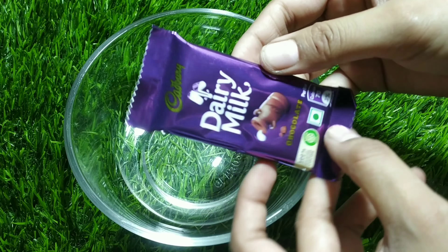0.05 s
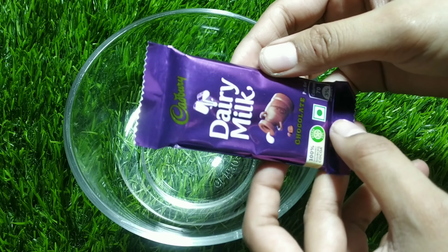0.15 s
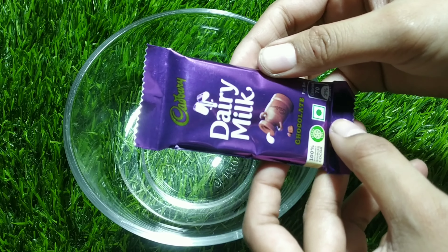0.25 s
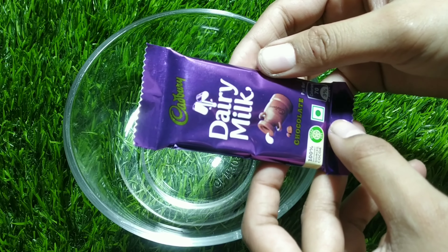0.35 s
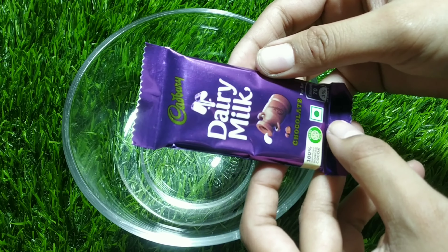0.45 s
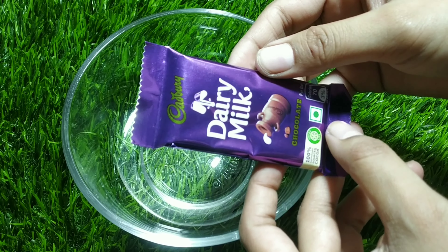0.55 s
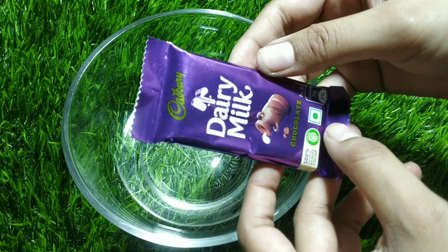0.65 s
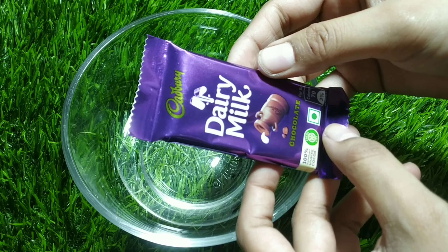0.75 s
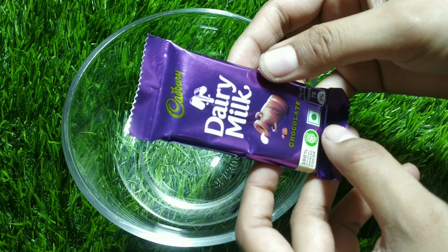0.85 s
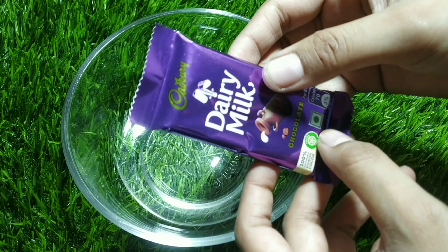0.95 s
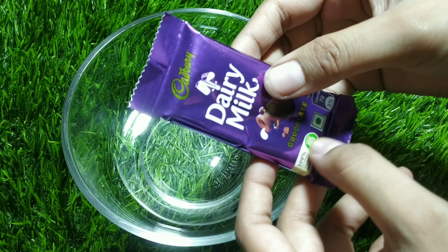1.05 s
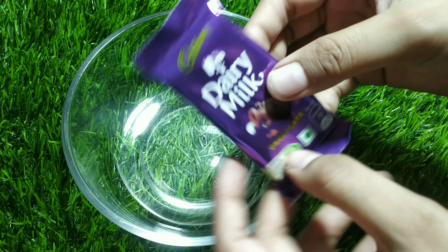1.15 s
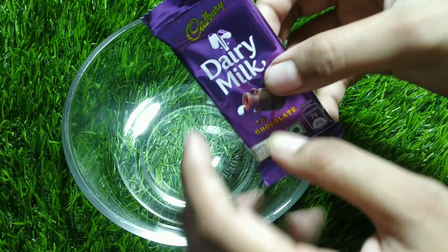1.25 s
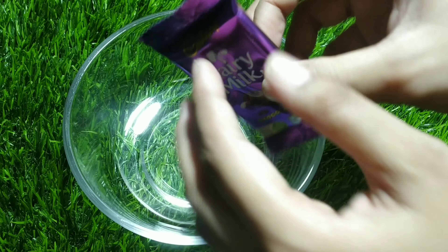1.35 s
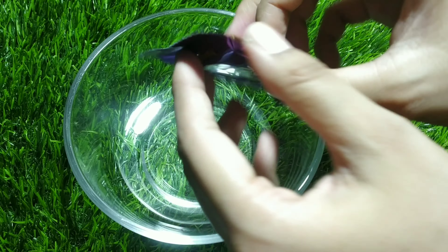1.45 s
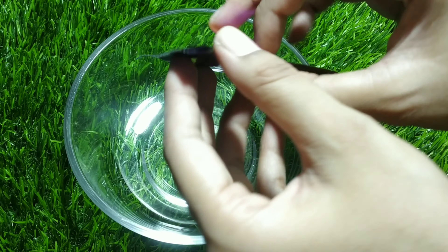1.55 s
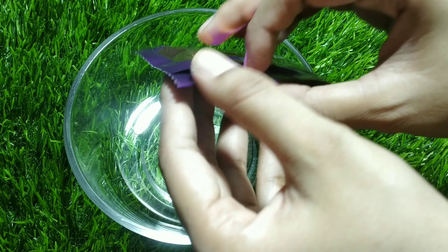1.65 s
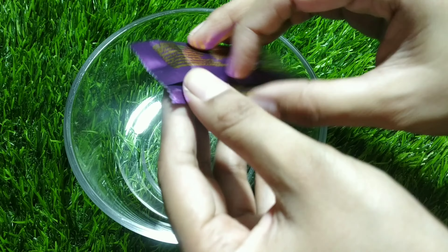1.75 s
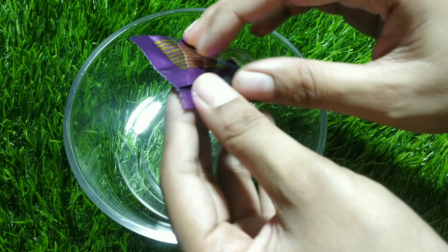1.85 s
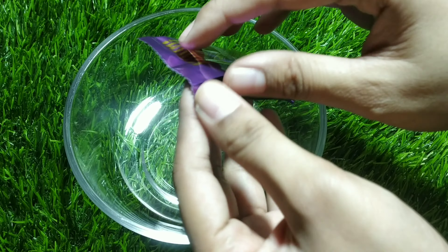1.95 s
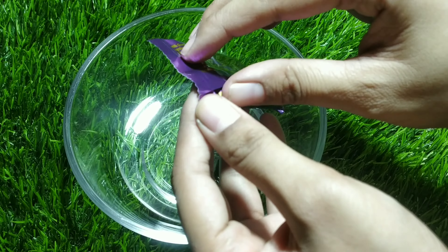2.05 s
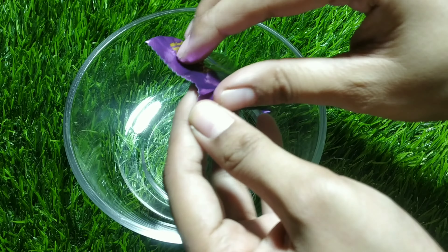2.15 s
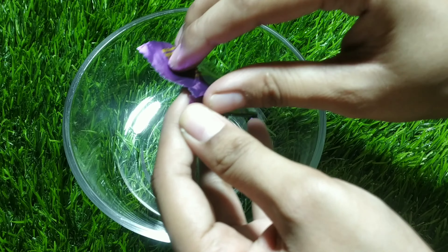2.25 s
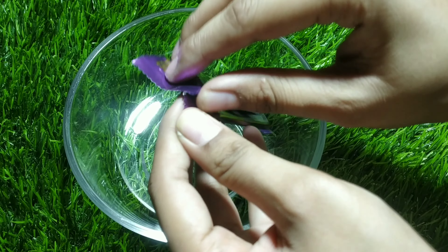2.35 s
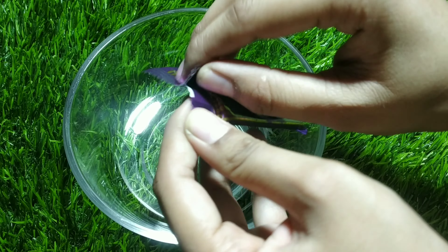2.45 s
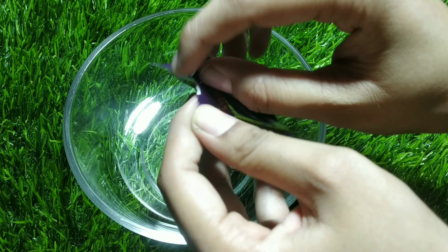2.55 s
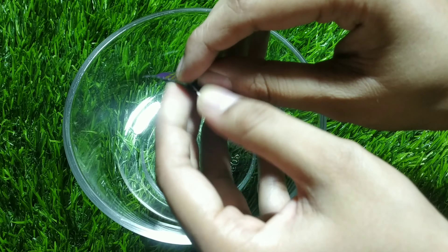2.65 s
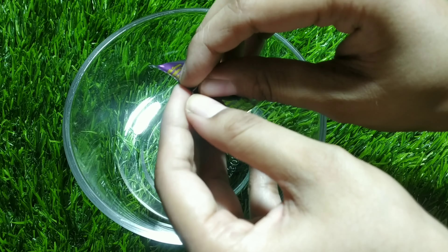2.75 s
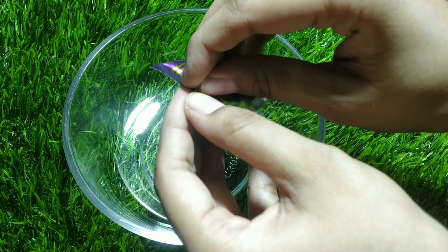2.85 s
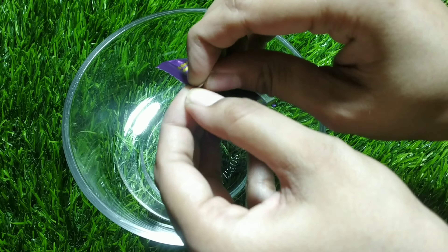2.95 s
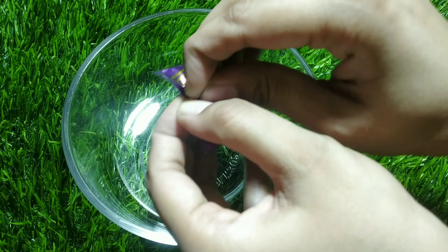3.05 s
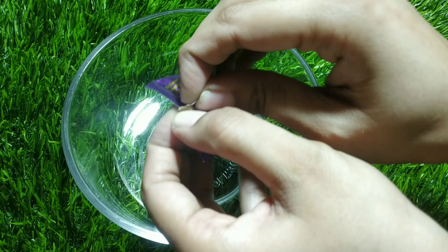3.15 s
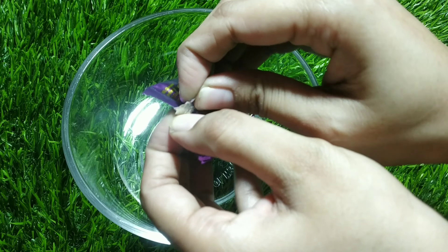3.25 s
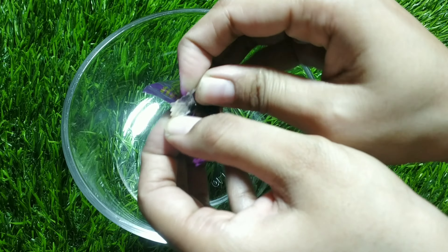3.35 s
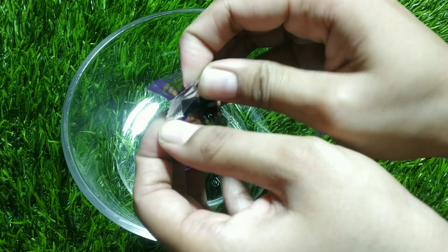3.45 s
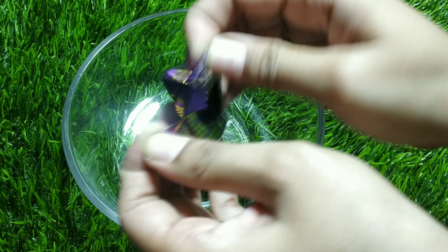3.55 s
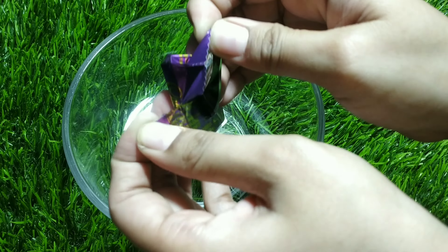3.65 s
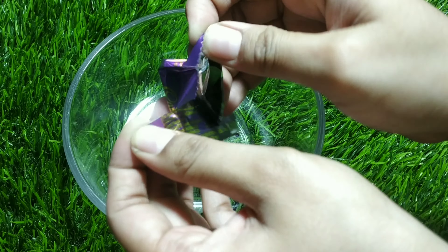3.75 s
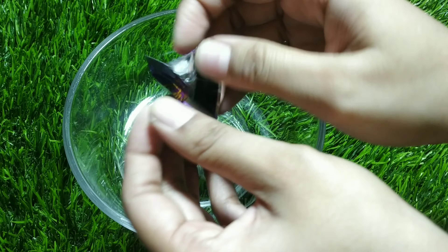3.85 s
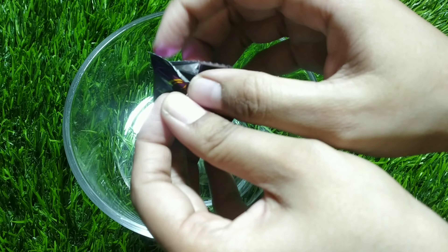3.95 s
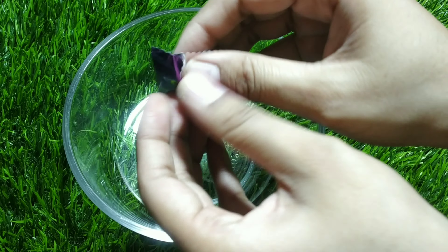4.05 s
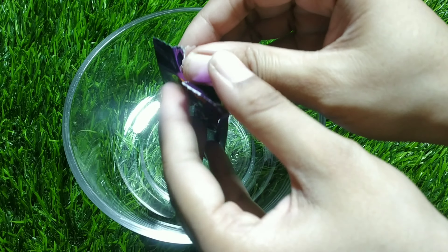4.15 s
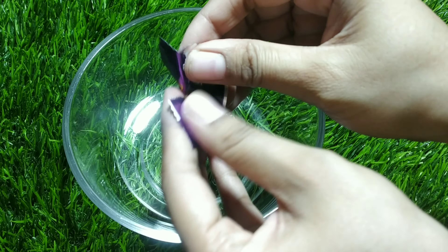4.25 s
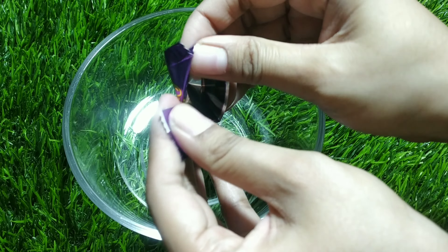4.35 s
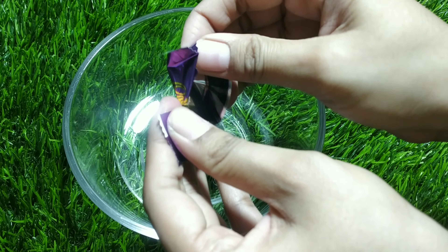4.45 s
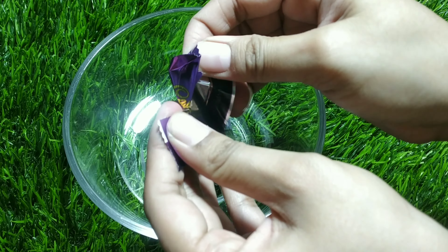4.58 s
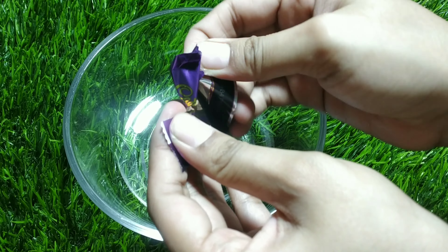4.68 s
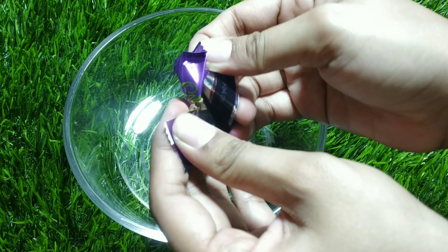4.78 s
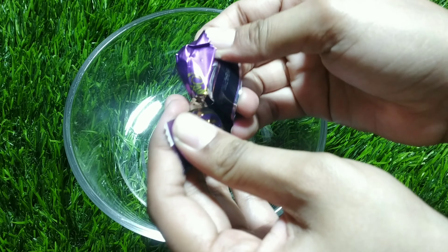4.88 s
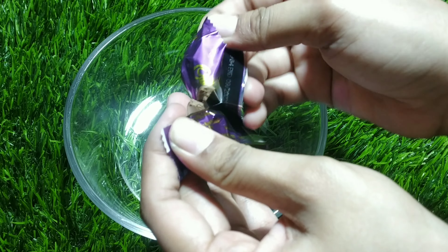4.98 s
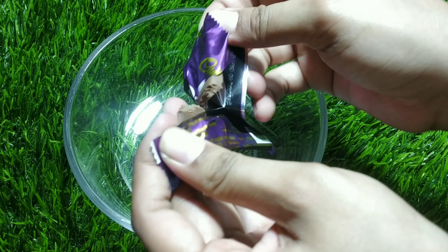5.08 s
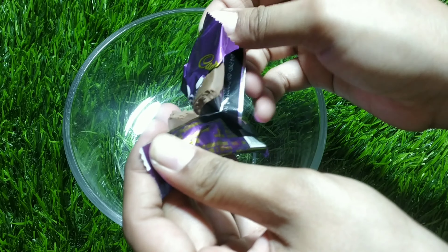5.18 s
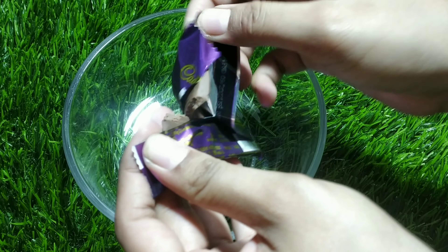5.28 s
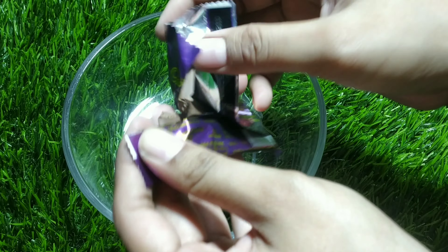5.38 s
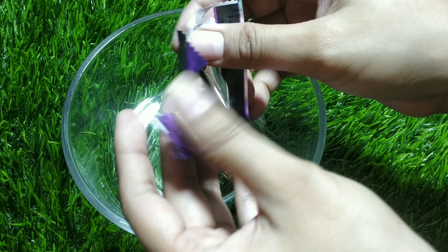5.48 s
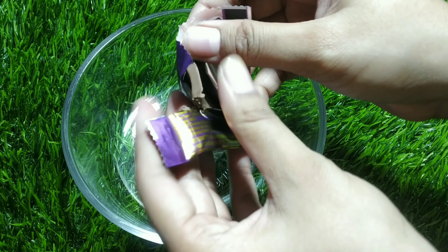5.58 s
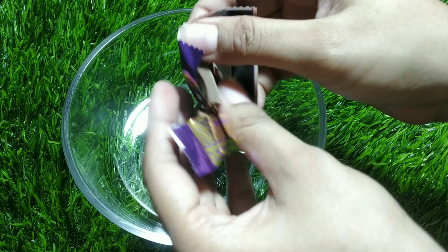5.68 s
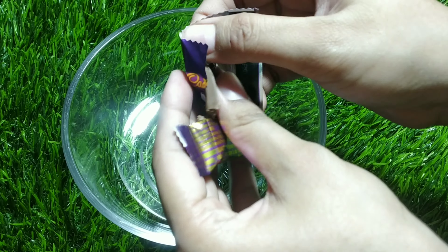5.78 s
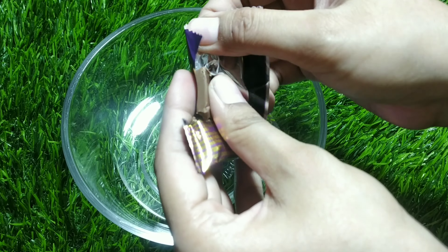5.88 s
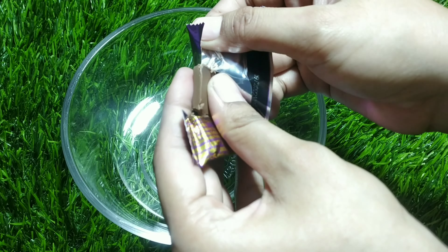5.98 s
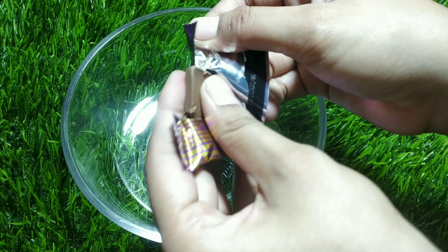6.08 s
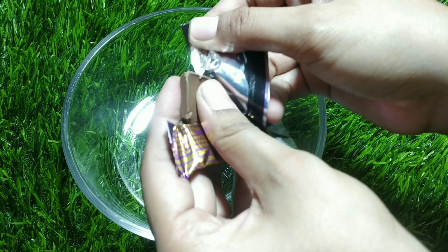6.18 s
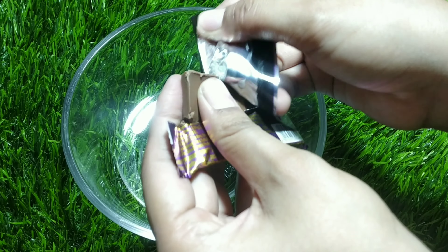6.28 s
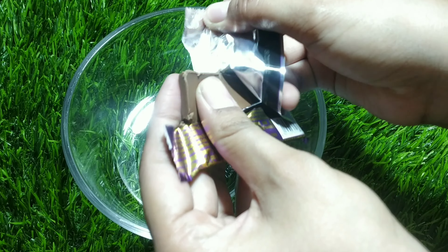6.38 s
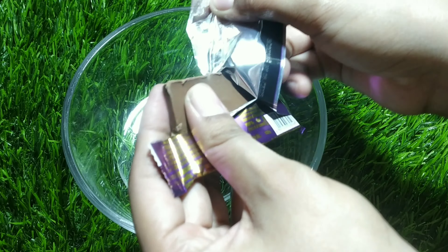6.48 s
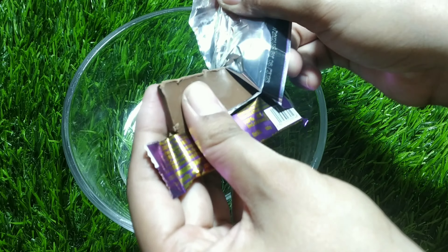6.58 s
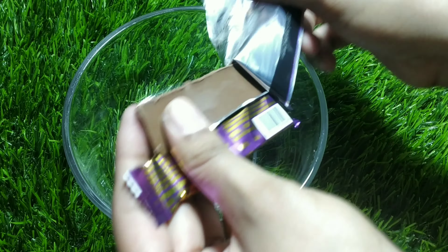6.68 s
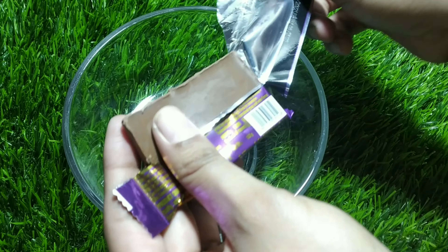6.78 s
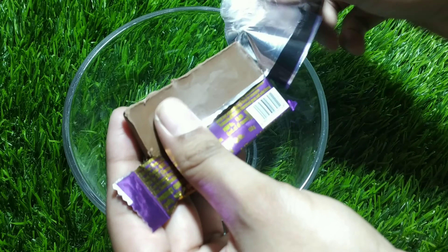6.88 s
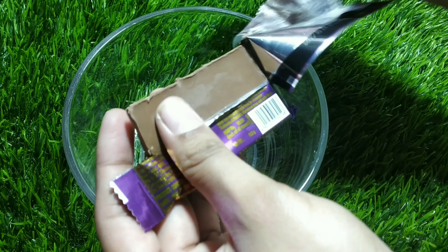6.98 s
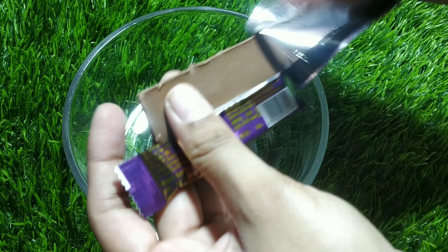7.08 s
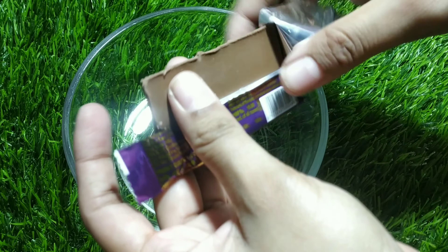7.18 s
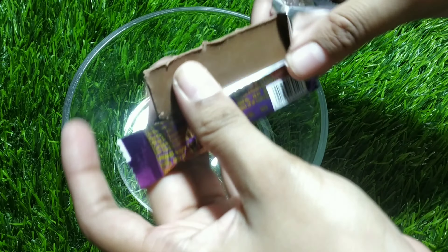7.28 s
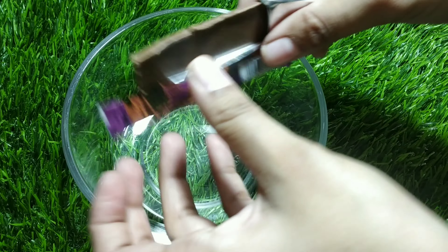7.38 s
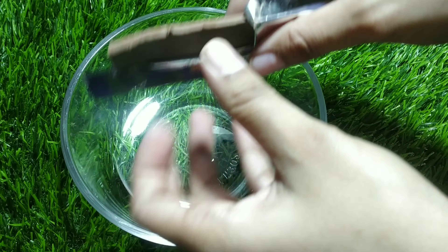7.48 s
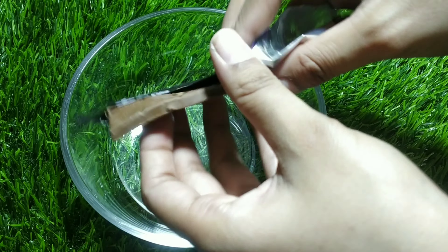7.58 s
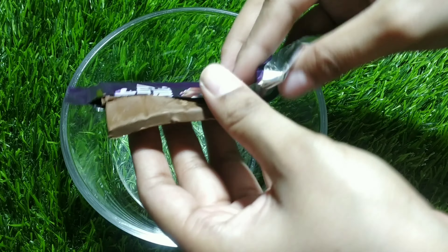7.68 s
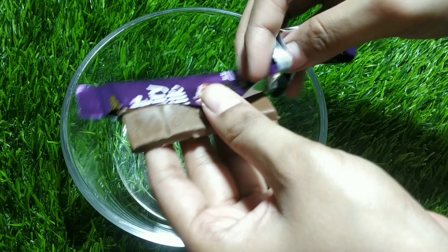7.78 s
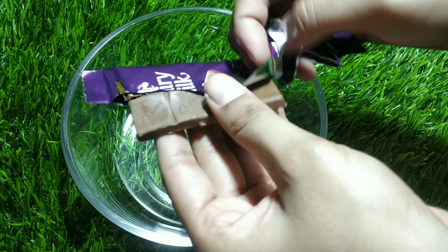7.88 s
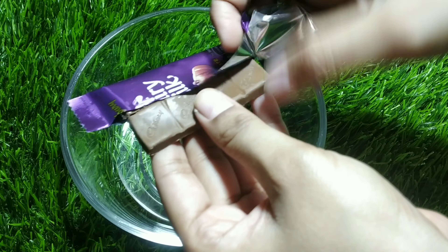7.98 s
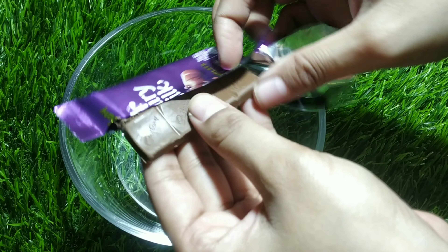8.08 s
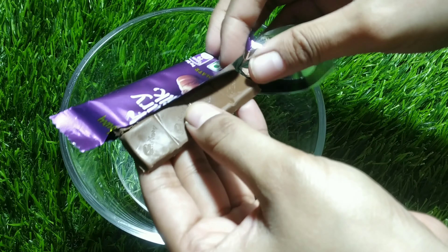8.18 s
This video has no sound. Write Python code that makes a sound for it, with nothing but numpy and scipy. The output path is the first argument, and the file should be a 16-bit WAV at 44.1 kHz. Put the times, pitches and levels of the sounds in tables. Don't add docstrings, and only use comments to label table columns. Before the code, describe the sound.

Close, dry phone pickup in a quiet room with low, slightly wavering hum and faint hiss. Around 0.1 s a few tiny foil ticks sound, then near silence. At about 1.27 s a very short, faint, rough skin squeak; from 1.8 s small bright crinkles and soft low hand brushes, with isolated snaps near 2.5 to 2.7 s. After a lull, light ticks lead to a hard, bright burst of snaps at 3.5 s, thinning to sparse ticks by 4.1 to 4.7 s. At 4.9 s the wrapper tears: strong sharp cracks, irregular and dense until about 6.2 s, with popping dents. From 6.3 to 6.9 s the foil peels with thick crackle, rustle and short pitched knocks from panels and bar, strongest around 6.7 to 6.8 s. Quieter rustles and knocks follow through 7.6 s, then renewed snapping, crackle and rustle from 7.7 s to the end.

```python
import sys
import numpy as np
from scipy import signal
from scipy.fft import rfft, irfft, next_fast_len
from scipy.io import wavfile
from scipy.ndimage import uniform_filter1d

SR = 44100
rng = np.random.default_rng(int(sys.argv[2]) if len(sys.argv) > 2 else 0)


def boost_factor(decibels):
    exponent = np.asarray(decibels, float) / 20
    return 10 ** exponent


def wrap_up_sound(samples):
    columns = np.atleast_2d(samples).T
    tamed = np.clip(columns, -1, 1)
    steps = np.round(tamed * 32767).astype(np.int16)
    wavfile.write(sys.argv[1], SR, steps)


N = 362943

SEAM_HZ = 2620


def level(x, db):
    return x * boost_factor(db) / np.sqrt(np.mean(x ** 2))


def colour(x, points):
    hz, db = np.transpose(points)
    size = next_fast_len(len(x))
    f = np.arange(size // 2 + 1) * SR / size + 1
    gain = boost_factor(np.interp(np.log(f), np.log(hz), db)) * np.minimum(f / hz[0], 1) ** 4
    return irfft(rfft(x, size) * gain, size)[:len(x)]


def ring(x, hz, width):
    return signal.lfilter(*signal.iirpeak(min(hz, SR / 2.5), hz / width, fs=SR), x)


def crest(x, db, ms):
    power = uniform_filter1d(np.abs(signal.hilbert(x)) ** 2, max(int(ms * SR / 1000), 1))
    return x * boost_factor(db) / np.sqrt(power.max())


def add(out, s, x):
    i = int(np.clip(s * SR, 0, N - 1))
    out[i:i + len(x)] += x[:N - i]


def bumps(table):
    t = np.arange(N) / SR
    return sum(boost_factor(db) * np.exp(-((t - s) / length) ** 4) for s, db, length in table)


def grains(rate, scatter_db, smear_ms):
    sizes = boost_factor(scatter_db * np.minimum(rng.exponential(size=N), 3))
    hits = (rng.random(N) < rate / SR) * sizes
    fade = np.exp(-1000 / (smear_ms * SR))
    power = signal.lfilter([1], [1, -fade], hits ** 2)
    return rng.standard_normal(N) * np.sqrt(power + 0.15)


def creases():
    # start_s, peak_db, centre_hz, mid_share_db
    sharp_creases = [(1.7828, -20, 11200, -8.5), (1.79, -23.5, 9200, -4.5), (2.4761, -18.5, 6900, -8),
                     (2.6566, -15, 7660, -15), (2.706, -21.5, 10600, -8.5), (3.12, -19.5, 8240, -15.5),
                     (3.3863, -25.5, 6100, -11), (3.4807, -10.5, 11200, -17), (3.496, -23.5, 7300, -8),
                     (3.514, -5, 8560, -24), (3.567, -23.5, 8200, 2), (3.5701, -24, 9000, 1),
                     (3.5753, -17, 10700, -14), (3.8677, -22, 9300, -13), (4.0235, -26, 11600, -3),
                     (4.044, -25, 7840, -10), (4.0997, -17, 8950, -7.5),
                     (4.896, -12, 7000, -10.5), (4.9296, -4, 8800, -12), (4.9208, -30, 10500, -14),
                  (4.982, -8.5, 7500, -23), (5.0345, -25.5, 11000, -7.5), (5.1073, -9.5, 11600, -33),
                  (5.1716, -22.5, 6500, -18), (5.1846, -25, 7950, -6), (5.3202, -17, 9800, -54),
                  (5.3969, -26, 9300, -15.5), (5.4837, -25, 8100, -9), (5.4905, -24, 8200, -30),
                  (5.5044, -24.5, 7100, -7), (5.54, -23.5, 8000, -7.5), (5.5633, -18, 8700, -12.5),
                  (5.7993, -13.5, 10000, -32), (5.893, -11.5, 6560, -30), (5.8973, -19.5, 9400, -5.5),
                  (5.9779, -22, 7460, -11), (6.0316, -9, 8200, -17), (6.14, -28.5, 11100, -23),
                  (6.195, -11.5, 6300, -5.5),
                     (6.2656, -19.5, 11200, -13.5), (6.2935, -17, 6600, -14.5), (6.3095, -25, 6800, -0.5),
                  (6.39, -22.5, 11300, -17), (6.4118, -12.5, 8600, -6), (6.4168, -17, 6450, -16),
                  (6.4277, -14.5, 7700, -5), (6.436, -19.5, 7240, 6), (6.5553, -19, 10700, -14.5),
                  (6.681, -21, 11000, -14), (6.6883, -24, 10000, -6), (6.706, -15, 9300, -0.5),
                  (6.7701, -11.5, 10600, -11.5), (6.786, -7.5, 12400, -21), (6.893, -15, 8840, 5.5),
                  (7.2832, -25.5, 11100, 2), (7.379, -23, 9500, -11), (7.584, -24, 8200, -13.5),
                  (7.6837, -20, 7700, 1.5), (7.9377, -13.5, 7550, -8.5), (7.9739, -14.5, 8550, -9),
                  (7.989, -16.5, 7800, -3), (8.0593, -23.5, 9100, -5), (8.1227, -18, 10700, -23)]
    # start_s, peak_db
    thin_ticks = [(0.0754, -28), (1.473, -38.5), (1.771, -34), (2.9732, -39), (3.411, -29), (3.4562, -32),
                  (3.613, -28), (3.8827, -26.5), (3.8917, -28), (3.975, -30.5), (3.984, -30), (4.3458, -33),
                  (4.372, -35), (4.389, -27), (4.667, -42), (4.7426, -37.5), (4.8194, -36), (4.9034, -29),
                  (4.9156, -40), (5.048, -33), (5.0752, -40), (5.091, -28), (5.6117, -32), (5.705, -29),
                  (5.7168, -26.5), (5.8228, -26), (5.879, -28), (6.2795, -42), (6.5239, -27.5),
                  (7.726, -26)]
    # start_s, peak_db
    plain_ticks = [(0.105, -27), (1.889, -28.5), (2.2175, -28), (2.3835, -36), (2.4464, -29.5),
                   (2.504, -27), (2.672, -32), (3.113, -40), (4.865, -35.5), (5.0578, -42), (5.157, -33),
                   (5.2545, -32), (5.2756, -31.5), (5.289, -36), (5.307, -38), (5.376, -39.5),
                   (5.641, -35.5), (6.4394, -22), (6.452, -31), (6.633, -26.5), (6.7274, -29),
                   (6.7383, -28), (6.9225, -37), (7.112, -29.5), (7.1497, -28), (7.2468, -30.5),
                   (7.3973, -29), (7.8198, -25), (8.0085, -31), (8.048, -27.5)]
    # start_s, peak_db
    dull_ticks = [(0.1738, -35), (1.764, -36), (2.1673, -42.5), (2.37, -38), (2.452, -36), (3.038, -32.5),
                  (3.28, -39), (3.2926, -26), (3.363, -45), (3.5421, -29), (3.774, -51), (3.825, -38),
                  (3.8535, -26.5), (3.9586, -33), (5.528, -34), (5.77, -30), (6.1866, -38), (6.483, -29.5),
                  (7.17, -32), (7.663, -27.5), (7.952, -28), (8.0762, -33.5), (8.177, -29.5)]
    # centre_hz, mid_share_db
    tick_kinds = [
        (9800, -16.5),
        (8200, -4.5),
        (6800, 0),
    ]
    snap_ms, tick_ms, tick_scatter_db = 2.6, 2.75, 1.4
    longer_per_share_db, quicker_per_peak_db = 0.1256, 0.32
    rows = []
    for s, db, hz, mid_db in sharp_creases:
        stretch_db = longer_per_share_db * (mid_db + 13.0) - quicker_per_peak_db * (db + 21.5)
        rows.append((s, db, hz, mid_db, snap_ms * boost_factor(stretch_db)))
    for ticks, (hz, mid_db) in zip((thin_ticks, plain_ticks, dull_ticks), tick_kinds):
        scatter = boost_factor(tick_scatter_db * rng.standard_normal(len(ticks)))
        rows += [(s, db, hz * k, mid_db, tick_ms) for (s, db), k in zip(ticks, scatter)]
    return rows


def snaps(edge=9.5, rise=0.049, focus_db=13.5, tail_db=-24, tail_ms=6.4):
    out, ms = np.zeros(N), np.arange(2048) * 1000 / SR
    high = signal.butter(3, 5200, "high", fs=SR, output="sos")
    rows = creases()
    chance = rng.standard_normal((len(rows), 3, len(ms)))
    for (s, db, hz, mid_db, length), (a, b, grain) in zip(rows, chance):
        cracks = boost_factor(8.775 * uniform_filter1d(grain, size=9))
        onset = (1 - np.exp(-ms / (rise * length))) ** 2
        decay = np.exp(-ms / (0.94 * length)) + 2.92 * np.exp(-ms / .5)
        tail = boost_factor(tail_db) * np.exp(-ms / tail_ms)
        shape = onset * (cracks * decay + tail)
        bright = signal.sosfilt(high, a * shape + edge * (ms == 0))
        bright = bright + boost_factor(focus_db) * ring(bright, hz, 0.48 * hz)
        bright = bright + ring(bright, hz * boost_factor(2 * a[-1]), 810)
        delay_s = 0.00043 * boost_factor(4 * np.tanh(b[-1]))
        bright = bright + .5 * np.roll(bright, int(SR * delay_s))
        mid = ring(ring(b * shape, 3000, 5000), 2700, 5500)
        add(out, s, crest(level(bright, 0) + level(mid, mid_db), db, 0.38))
    return out


def struck():
    # start_s, peak_db
    bar_knocks = [(1.79, -36), (1.889, -40), (2.5033, -30.5), (6.689, -29.5), (6.706, -23), (6.779, -25),
                  (7.17, -29), (7.3799, -27)]
    # start_s, peak_db
    wide_knocks = [(0.104, -36), (2.6948, -36), (2.7057, -38), (3.2932, -32.5), (3.825, -35.5),
                   (4.895, -20), (5.013, -31.5), (5.179, -26), (5.1834, -32), (5.307, -29), (5.5037, -33),
                   (6.3554, -29.5), (6.428, -24.5), (6.4816, -28), (6.585, -23.5), (6.629, -31.5),
                   (6.6814, -29), (6.697, -18), (6.7049, -19), (6.7125, -19), (6.74, -27), (6.768, -28),
                   (6.7776, -21.5), (6.891, -26.5), (7.951, -30.5), (7.9881, -25.5), (8.06, -29),
                   (8.077, -46), (8.1233, -21.5), (8.1796, -26.5)]
    # start_s, peak_db
    end_knocks = [(2.452, -34.5), (2.657, -39), (2.6721, -28), (3.282, -36), (3.388, -31), (3.4557, -29),
                  (3.4795, -34), (3.543, -33), (3.5628, -22), (3.6129, -32), (3.647, -39), (3.851, -34.5),
                  (3.959, -35.5), (4.025, -33.5), (4.099, -34), (4.387, -29.5), (4.8428, -37),
                  (4.9303, -29), (5.0478, -31), (5.0906, -25), (5.5635, -27.5), (5.64, -36.5),
                  (5.7057, -42), (5.981, -34.5), (7.117, -31.5), (7.38, -33), (7.586, -35.5), (7.662, -45)]
    # start_s, peak_db
    flap_knocks = [(2.2186, -46), (2.3704, -34), (2.4772, -39), (3.4144, -35.5), (4.9818, -26.5),
                   (5.771, -26), (5.825, -35.5), (5.8926, -26), (6.031, -45), (6.187, -29.5), (6.1958, -50),
                   (6.347, -26.5), (6.419, -35), (6.438, -30), (7.2851, -37), (7.683, -34), (7.818, -51),
                   (7.9379, -24)]
    # time_s, pitch_hz
    wide_pitch = [(0, 1040), (4.9, 1093), (5.18, 1330), (5.5, 1060), (6.45, 1000), (6.71, 930),
                  (7.99, 1090), (8.12, 1110)]
    bar_scatter, wide_scatter, end_scatter, flap_scatter = (1.2, .25, .3, .4)
    rows = [(s, db, np.interp(s, *np.transpose(wide_pitch)), wide_scatter) for s, db in wide_knocks]
    rows += [(s, db, 595, bar_scatter) for s, db in bar_knocks]
    rows += [(s, db, 1630, end_scatter) for s, db in end_knocks]
    rows += [(s, db, 2405, flap_scatter) for s, db in flap_knocks]
    return sorted(rows)


def knocks(cycles=4.7, push_ms=1.65, partner_db=-9, thud_db=-16):
    out, ms = np.zeros(N), np.arange(1024) * 1000 / SR
    rows = struck()
    chance = rng.standard_normal((len(rows), len(ms)))
    for (s, db, hz, scatter_db), a in zip(rows, chance):
        hz = hz * boost_factor(scatter_db * np.clip(a[-2], -1.5, 1.5))
        push = (a + 8.4 * (ms == 0)) * np.exp(-ms / push_ms)
        soft = ring(push, hz, 2.0 * hz)
        partner = ring(ring(soft, hz * 2.18, 1.6 * hz), hz * 2.28 * boost_factor(0.7 * a[-1]), hz / 0.7)
        thud = ring(ring(push, 646, 630), 280, 640)
        main = ring(soft, hz, 200 + hz / cycles / 3)
        add(out, s, crest(level(main, 0) + level(partner, partner_db) + level(thud, thud_db), db, 0.8))
    return out


def effort(column):
    # peak_s, crackle_db, rustle_db, fall_ms (time to fall 10 dB)
    finger_moves = [(.094, -63, -71, 60), (1.193, -62.5, -70, 55), (1.55, -66.5, -70, 65), (1.781, -53, -53, 28),
                    (1.985, -68, -68.5, 252), (2.47, -57.5, -59, 91), (2.675, -56, -54.5, 70),
                    (3.1, -68, -72.5, 402), (3.398, -57.5, -64, 94), (3.48, -49, -65, 56),
                    (3.574, -43.5, -49, 40.5), (3.877, -57, -54, 66), (4.09, -55.5, -59, 60),
                    (4.271, -41.5, -54.5, 13), (4.38, -60.5, -58, 66),
                    (4.83, -69, -63, 120), (4.923, -42, -56, 50), (5.06, -49.5, -56.5, 120),
               (5.164, -58, -67, 33), (5.277, -60.5, -53.5, 60), (5.498, -54, -53.5, 106),
               (5.711, -49, -46, 19), (5.899, -55.5, -56, 175), (6.206, -66, -71, 32), (6.29, -50, -63, 90),
               (6.429, -51.5, -50.5, 115), (6.507, -66, -54, 71), (6.7, -55, -42, 57),
               (6.781, -44.5, -48, 57), (6.917, -51.5, -49, 38), (7.15, -56, -54, 68),
               (7.297, -58.5, -55, 49), (7.4, -64.5, -63, 76), (7.59, -75, -71, 55),
               (7.683, -48, -48.5, 109), (7.909, -47, -48.5, 60), (7.972, -45.5, -55.5, 48),
               (8.051, -44.5, -40.5, 20), (8.171, -57, -59, 45), (8.215, -50, -48, 52)]
    # crackle_db, rustle_db
    rest = (-79.5, -74.5)
    rise_share = 0.72
    t = np.arange(0, N, 32) / SR
    power = boost_factor(rest[column]) ** 2
    for s, *db, ms in finger_moves:
        away = np.where(t < s, (s - t) / rise_share, t - s) * 1000 / ms
        power = power + boost_factor(db[column] - 10 * away) ** 2
    return np.interp(np.arange(N) / SR, t, np.sqrt(power))


def handling():
    # freq_hz, level_db (per Hz)
    foil_colour = [(5000, -11), (6500, -2.5), (9500, 3.5), (12500, 1), (15500, -7)]
    # pitch_hz, width_hz, level_db
    panel_modes = [
        (1060, 260, 9.5),
        (1603, 290, 6),
        (2350, 160, 2),
        (594, 380, -0.5),
    ]
    # centre_s, level_db, length_s
    slide_moves = [(1.35, -67, 0.022), (1.6, -56.5, 0.028), (4.019, -45, .004), (4.349, -47, .006),
                   (4.662, -44.5, 0.01), (4.81, -52.5, 0.0091), (4.967, -33, .0025)]
    t = np.arange(N) / SR
    wide = colour(grains(260, 4.0, 1.0), foil_colour)
    busy_db = uniform_filter1d(rng.standard_normal((4, N)), size=1600) * 120
    patches = []
    for hz, walk_db in zip((3720, 6500, 9500, 12800), busy_db):
        patch = ring(ring(grains(160, 3.9, 1.0), hz, 0.52 * hz), hz, 0.5 * hz)
        patches.append(boost_factor(walk_db) * level(patch, 0))
    crackle = level(wide, -0.22) + level(sum(patches[1:]), -0.74)
    rub = grains(220, 3.95, 1.66)
    held_hz = np.interp(t, *np.transpose(struck())[::2])
    rustle = np.zeros(N)
    for hz, width, db in panel_modes:
        octaves_away = np.abs(np.log2(hz / held_hz))
        rustle += boost_factor(db - 3.2 * octaves_away) * ring(rub, hz, width)
    shift = ring(ring(rub, 460, 970), 380, 660)
    rustle = level(rustle, 1.6) + level(shift, -4.5)
    slide = level(colour(rng.standard_normal(N), foil_colour), 0) * bumps(slide_moves)
    foil_gain, panel_gain = effort(0), effort(1)
    shared = level(patches[0], -5.5) * np.sqrt(foil_gain * panel_gain)
    return crackle * foil_gain + rustle * panel_gain + shared + slide


def pops(edge=2.2):
    # start_s, peak_db, pitch_hz
    panel_pops = [(1.7645, -42, 1680), (2.42, -44, 1670), (2.5045, -33, 1500), (3.2935, -37, 1800),
                  (3.4148, -42, 1740), (7.199, -39.5, 380), (3.789, -44.5, 1690), (3.814, -46, 920),
                  (3.8956, -40.5, 820), (7.118, -37, 1900), (4.8579, -44.0, 1130), (4.9072, -42.0, 1700),
                  (4.9815, -27, 1730), (5.035, -38, 1770), (5.2565, -45.0, 1400), (5.2893, -35, 1630),
                  (5.3075, -33, 1900), (5.4842, -39, 1080), (5.6119, -43, 1670), (5.6847, -39, 1040),
                  (5.693, -39, 850), (5.8233, -33.5, 1480), (5.8928, -22, 1810), (5.9109, -44, 1710),
                  (6.1402, -46, 1100), (6.1863, -36, 1190), (6.3255, -43, 1170), (6.4358, -30, 1920),
                  (6.4518, -36, 1080), (6.4752, -40.5, 1780), (6.4952, -41.5, 980), (6.534, -38, 970),
                  (6.6098, -44, 1000), (6.7987, -43, 870), (7.3795, -30, 1970), (7.1929, -41, 1030),
                  (7.2944, -43, 870), (7.6037, -44.5, 1700), (7.7251, -42.0, 1660), (7.251, -42, 380),
                  (8.0239, -40.0, 860), (8.0766, -39.0, 1140), (8.2142, -34, 1140), (8.2224, -39, 1800)]
    # start_s, peak_db, pitch_hz
    seam_pops = [(2.4201, -43, 2600), (3.2815, -44, 2600), (3.3876, -28, 4300), (3.4074, -40, 4100),
                 (3.4739, -36, 4300), (3.5221, -32, 4700), (3.6316, -47.5, 2600), (8.193, -40, 4000),
                 (4.9569, -35, 3000), (4.9976, -39, 2500), (5.0219, -41, 2400), (5.3913, -47, 2500),
                 (5.6928, -45, 2700), (5.8441, -41, 2500), (5.8882, -30, 2460), (5.9113, -40, 2500),
                 (5.9434, -43, 2500), (6.1682, -44.0, 2500), (6.2726, -44.0, 4300), (6.325, -46, 2400),
                 (6.356, -34, 2400), (6.4178, -26.5, 2500), (6.4572, -37, 2500), (6.4644, -41, 3600),
                 (6.4771, -44.0, 2200), (6.4816, -32, 2300), (6.4929, -37, 2400), (6.6885, -33, 2720),
                 (6.7449, -39.5, 2400), (6.7125, -31, 2300), (6.9216, -44, 2400), (6.9378, -41, 3000),
                 (6.942, -46.0, 2800), (7.0992, -46, 2800), (7.1086, -36, 2800), (7.1604, -36, 2900),
                 (7.1955, -41.5, 2700), (7.2179, -45, 3000), (7.2946, -45, 2500), (7.5934, -47.5, 2900),
                 (7.603, -44.0, 3000), (7.7254, -36, 4100), (7.9649, -34.5, 2400), (8.0235, -43.5, 4200),
                 (8.0381, -33, 3900), (8.1177, -41, 3800), (8.1728, -39, 3500), (8.187, -37, 3400),
                 (8.2135, -44, 2300), (8.2224, -38.5, 3500)]
    # start_s, peak_db, pitch_hz
    foil_pops = [(2.4881, -42.0, 8300), (2.4993, -35.0, 10100), (3.3125, -40, 12000), (3.4072, -39, 7800),
                 (3.4148, -41.5, 8100), (3.472, -36, 12300), (3.814, -45, 11000), (3.6315, -42.0, 10400),
                 (3.7749, -42, 12000), (4.3303, -40.5, 11900), (4.339, -38, 9200), (6.781, -25, 11000),
                 (4.948, -33, 8800), (4.9158, -37, 11100), (5.058, -36, 9200), (5.1781, -33, 6000),
                 (5.2604, -38, 10100), (5.2681, -40, 5900), (5.2951, -44.5, 7300), (6.355, -35, 6600),
                 (5.7003, -36, 11600), (5.7331, -44.0, 6900), (5.8876, -42.5, 5800), (5.71, -34, 12000),
                 (6.347, -34, 6500), (5.475, -38, 9500), (6.7425, -30, 10200), (6.3656, -36, 10700),
                 (6.4957, -41, 12800), (6.6285, -42, 9000), (6.767, -24.5, 8500), (6.673, -41.0, 11100),
                 (6.7455, -38.0, 7800), (6.8317, -37, 8600), (6.9232, -39, 9700), (6.9569, -41, 10700),
                 (6.712, -28, 11500), (7.165, -37, 5800), (7.2994, -43.0, 10700), (7.344, -41, 9300),
                 (7.3539, -43, 6800), (7.6722, -38.0, 9500), (7.7982, -35, 11900), (7.932, -42, 7000),
                 (8.023, -31, 11600), (8.183, -40, 11300), (8.2136, -36.0, 7200), (8.2228, -32, 6300)]
    # start_s, peak_db, pitch_hz
    panel_rings = [(3.566, -27.5, 1640), (5.094, -36.5, 1110), (5.705, -41, 1520), (6.734, -33, 1160),
                   (7.99, -28.5, 1050), (8.041, -35, 1020), (9.3, -36.5, 1060), (7.70, -42, 1050),
                   (5.276, -40, 1280), (6.719, -33, 930)]
    # start_s, peak_db, pitch_hz
    corner_pops = [(2.371, -33, 3100), (1.7725, -34, 4000), (2.4525, -35, 4000), (7.2855, -33, 3400),
                   (5.54, -32, 4200), (6.5, -30, 4200), (4.966, -34, 4000)]
    # decay_ms, width_share (of pitch)
    pop_kinds = [
        (1.34, 0.31),
        (2.2, 0.41),
        (1.6, .6),
        (3.3, .17),
        (1.27, 0.59),
    ]
    out, ms = np.zeros(N), np.arange(1024) * 1000 / SR
    tables = (panel_pops, seam_pops, foil_pops, panel_rings, corner_pops)
    for table, (decay_ms, share) in zip(tables, pop_kinds):
        chance = rng.standard_normal((len(table), len(ms)))
        for (s, db, hz), a in zip(table, chance):
            burst = (a + edge * (ms == 0)) * np.exp(-ms / decay_ms)
            soft = ring(burst, hz, min(3 * share * hz, SR / 4))
            add(out, s, crest(ring(soft, hz, share * hz), db, 0.87))
    return out


def drags():
    # centre_s, level_db, length_s
    drag_moves = [(2.18, -65, 0.14), (1.987, -61, .012), (3.98, -66.5, 0.17), (6.225, -56.5, .022),
                  (7.15, -47, 0.019)]
    rub = grains(600, 1.8, 1.2)
    seam = ring(rub, SEAM_HZ, 590) + 0.6 * ring(rub, 3600, 2500)
    return level(seam, 0) * bumps(drag_moves)


def squeak():
    # centre_s, level_db, half_length_s, pitch_hz
    s, db, length, hz = (1.265, -50, .011, 1380)
    waver = 1 + 0.077 * np.cos(2 * np.pi * 55 * (np.arange(N) / SR - s) + np.pi)
    rough = boost_factor(5.1 * level(uniform_filter1d(rng.standard_normal(N), size=100), 0))
    tone = np.sin(2 * np.pi * np.cumsum(hz * waver) / SR)
    return rough * tone * bumps([(s, db + 0.5, length)])


def brushes():
    # centre_s, level_db, length_s
    hand_brushes = [
        (1.824, -55, 0.088),
        (2.345, -52.5, 0.031),
        (2.35, -64.5, 0.63),
        (7.21, -58.5, 0.063),
    ]
    noise = rng.standard_normal((2, N))
    low = ring(ring(noise[0], 197, 100), 195, 155)
    low = low + 0.16 * ring(ring(noise[1], 75, 60), 115, 60)
    return level(low, 0) * bumps(hand_brushes)


def room():
    # freq_hz, level_db (per Hz)
    room_colour = [(30, -42), (75, -28), (92, -43), (111, -10), (140, -23.5), (200, -4), (285, -5),
                   (420, -10), (1100, -13), (2600, -27), (16000, -34)]
    sway = uniform_filter1d(rng.standard_normal(N), size=6000) * 6000 ** .5
    return level(colour(rng.standard_normal(N), room_colour), -60) * boost_factor(1.06 * sway)


def scene():
    wrapper = snaps() + knocks() + handling()
    wrapper = wrapper - 0.5 * ring(wrapper, 1396, 155)
    wrapper = wrapper - 0.48 * ring(wrapper, 5035, 560)
    wrapper = wrapper + 0.34 * ring(wrapper, SEAM_HZ, 190)
    return (wrapper + squeak() + brushes() + room() + drags() + pops())[None]


def band_limit(x):
    return signal.sosfilt(signal.butter(12, 17320, fs=SR, output="sos"), x)


def record(dry):
    round_off, top_hz, steady_top_hz = .8, 16700, 15500
    dry = round_off * np.tanh(dry / round_off)
    full, steady = (signal.sosfiltfilt(signal.ellip(8, .1, 45, hz, fs=SR, output="sos"), dry)
                    for hz in (top_hz, steady_top_hz))
    top = full - steady
    loud = uniform_filter1d(top ** 2, size=256) > boost_factor(-62) ** 2
    gate = uniform_filter1d(1. * loud, size=128)
    return band_limit(steady + boost_factor(-19.0) * gate * top)


dry = scene()
out = record(dry)
wrap_up_sound(out)
```